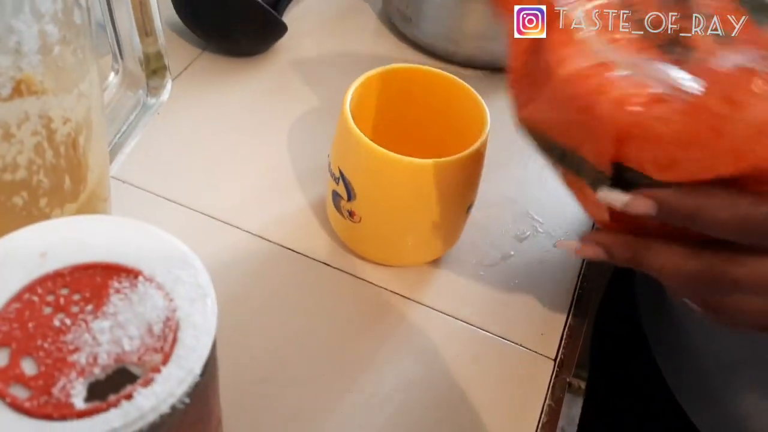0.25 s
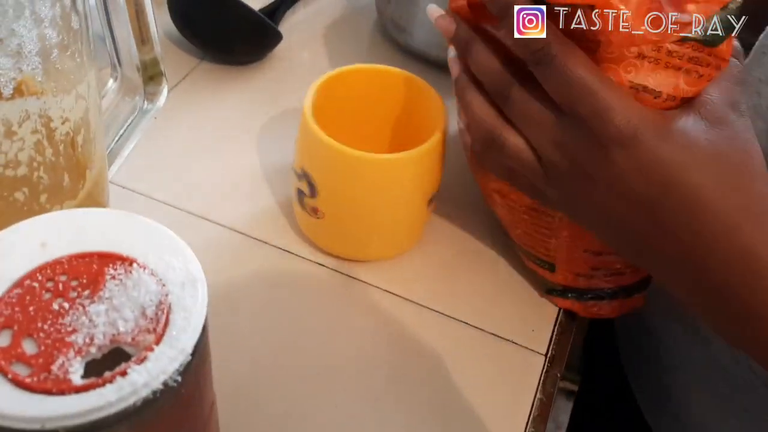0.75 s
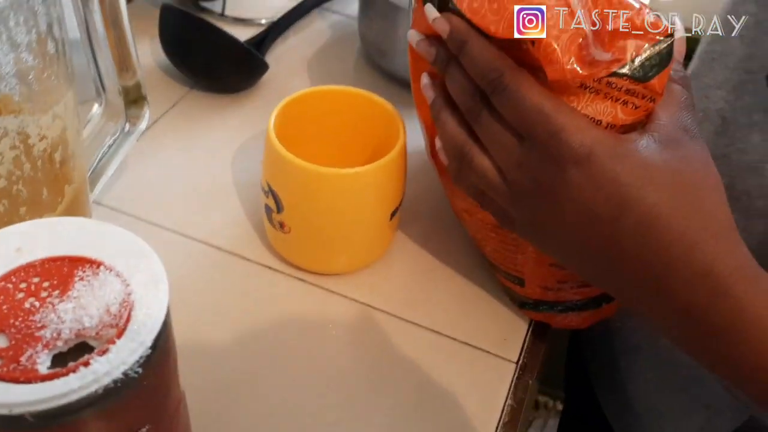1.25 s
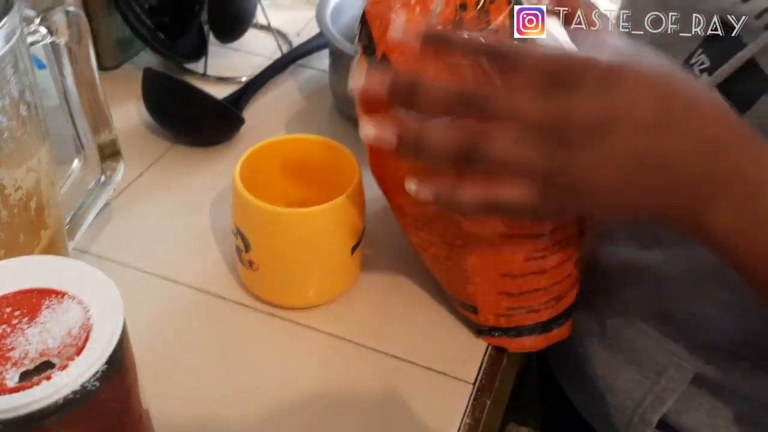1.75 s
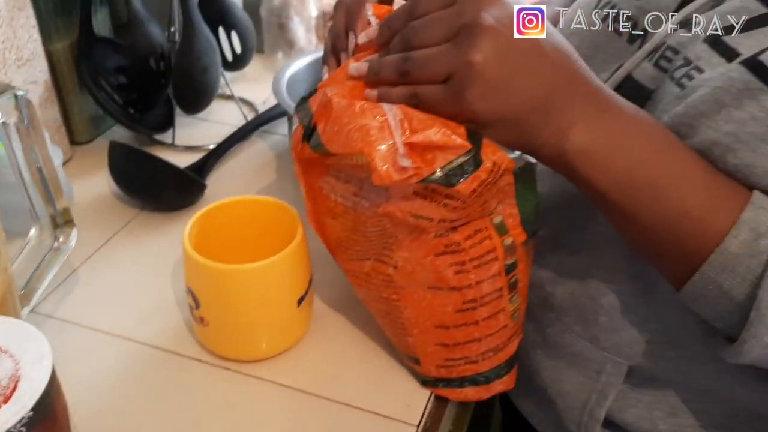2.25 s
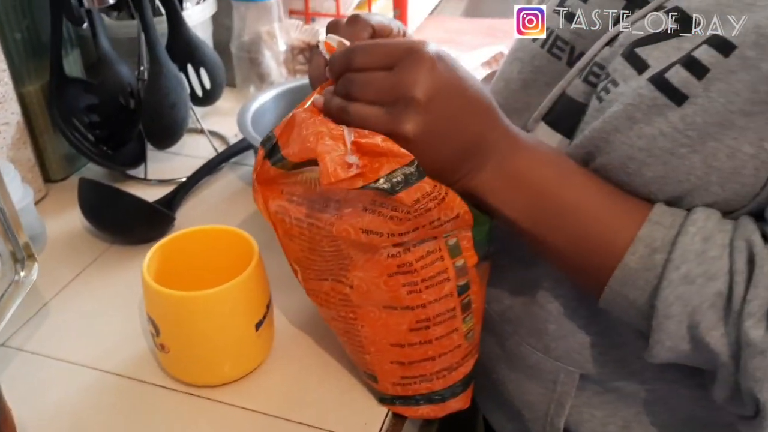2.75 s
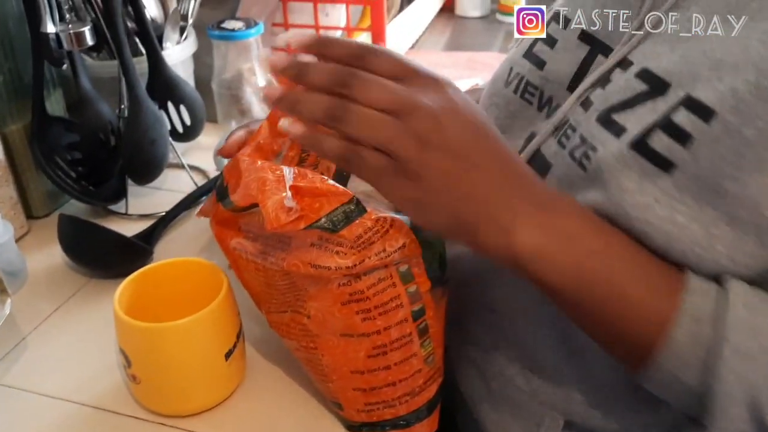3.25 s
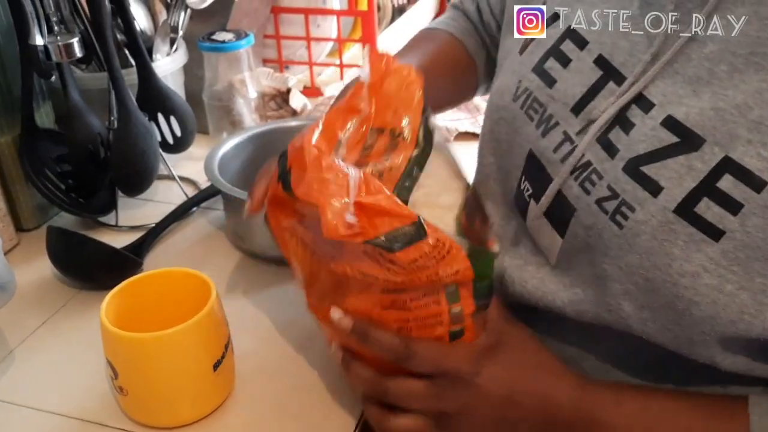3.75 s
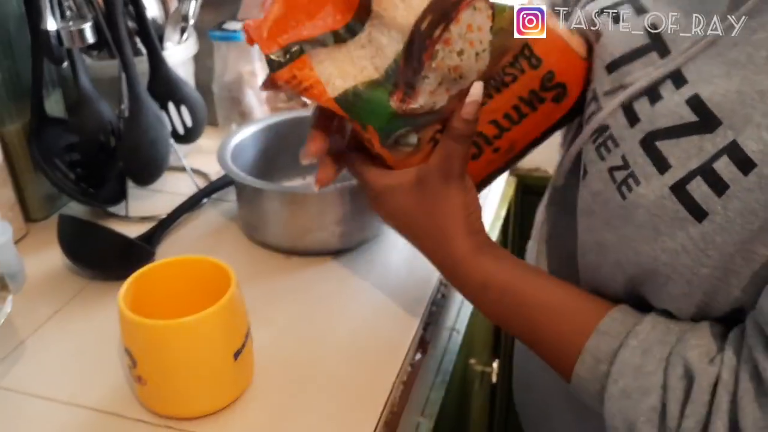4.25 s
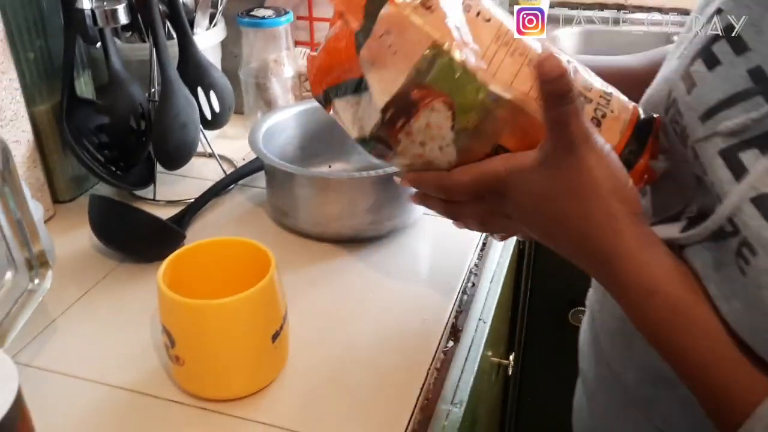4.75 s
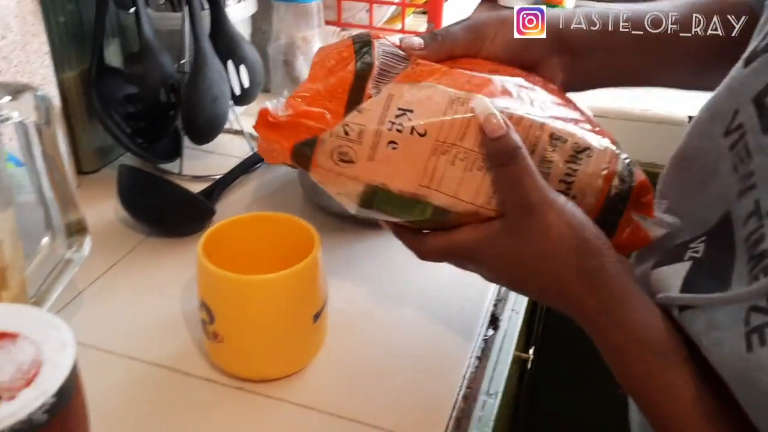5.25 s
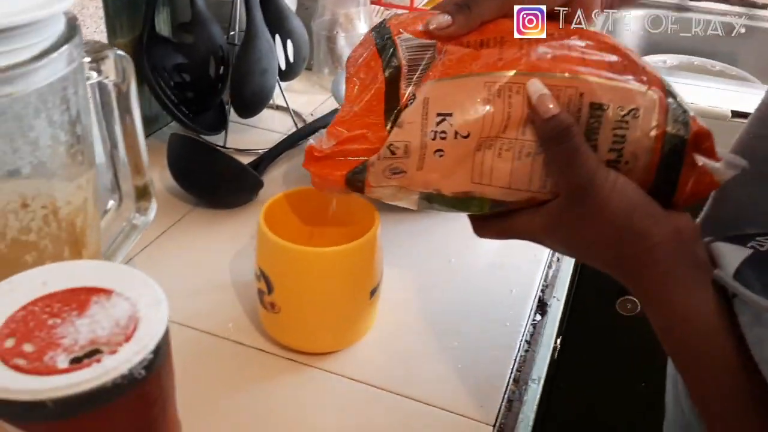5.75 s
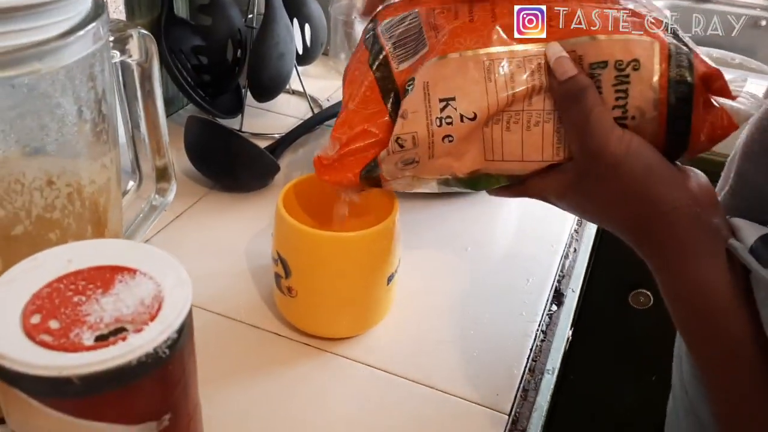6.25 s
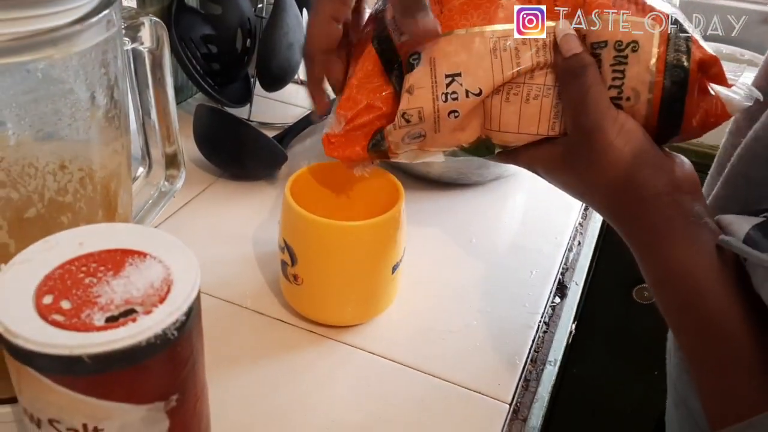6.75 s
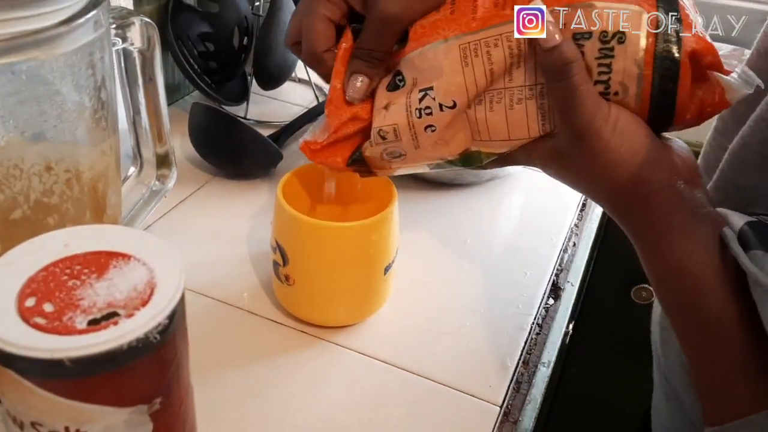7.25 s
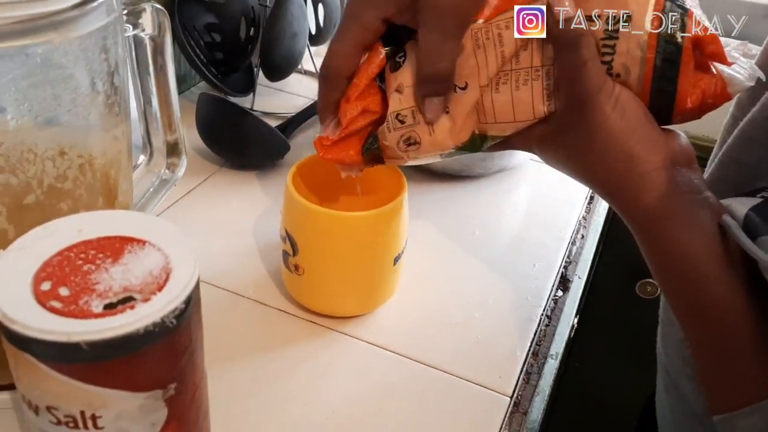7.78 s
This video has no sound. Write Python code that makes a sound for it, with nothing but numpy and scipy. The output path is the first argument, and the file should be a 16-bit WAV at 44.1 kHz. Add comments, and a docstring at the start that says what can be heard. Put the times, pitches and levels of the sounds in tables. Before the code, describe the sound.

A stiff plastic packet crinkles and snaps as rice shifts inside, then a thin stream of grains patters into a plastic cup.

```python
"""A plastic packet of dry rice is set down on a kitchen counter: its stiff film snaps and the rice lands
with a soft thud. At 0.74 s it drags, sticking and slipping in one short judder. As it is opened and
lifted, creases crinkle, taut patches pop, and rice slides and slumps inside. From 5.6 s a thin stream of
grains patters into a plastic cup while the packet crackles on. All along, two close microphones also
hear the small room's echo and low rumble."""
import sys
import numpy as np
from scipy import signal
from scipy.fft import rfft, irfft, next_fast_len
from scipy.io import wavfile
from scipy.ndimage import uniform_filter1d

SR = 44100
rng = np.random.default_rng(int(sys.argv[2]) if len(sys.argv) > 2 else 0)


def inscribe(sig):
    """Save sig as 16-bit PCM at rate SR to the path in sys.argv[1].

    A 1-D sig is mono; a 2-D sig holds one channel per row.
    Samples are clipped to [-1, 1] before scaling.
    """
    pcm = np.round(np.clip(np.atleast_2d(sig).T, -1, 1) * 32767)
    wavfile.write(sys.argv[1], SR, pcm.astype(np.int16))


N = 353682
TIME = np.arange(N) / SR
FREQS = np.fft.rfftfreq(4096, 1 / SR)  # the frequencies at which filters are drawn, in Hz


# Creases flipping; a broad fold has more bass: t/s, energy/dB, bass over treble/dB, length/s
CREASE_SNAPS = [(.0254, -0.5, 16, 0.0017), (.0798, -3, 6, 0.0091), (.099, 1, 2, 0.0019),
                (.1726, 4, -5.5, 0.0027), (.2696, 8, 9, 0.0021), (.321, 4, -33, 0.00038),
                (.6364, -3.5, 6, 0.00089), (.6843, 6.5, -9, .0042), (.8837, 2, 14.5, 0.0044),
                (1.0905, -11, 10, 0.0021), (1.1163, -7, 5, 0.0032), (1.1775, -7, 10, 0.0082),
                (1.1906, -3.5, -11, .0015), (1.2032, -6.5, 28, 0.0031), (1.2384, 5, 6, 0.0089),
                (1.2887, -3, 4.5, 0.0099), (1.5099, -0.5, -7, 0.0029), (1.5476, -8, 14, 0.00049),
                (1.552, 0.5, 4, 0.0017), (1.6337, -3.5, 19, 0.015), (1.6735, 1, 15.5, 0.0025),
                (1.7979, -3.5, 2, 0.003), (1.8872, 0, -2, 0.003), (1.9562, 3.5, -14, 0.0053),
                (1.993, 0.5, -8, 0.0023), (2.1509, -9.5, -4, .003), (2.247, -5.5, 10.5, 0.005),
                (2.4484, -5.5, 13, 0.0059), (2.4866, -2, 14, .0037), (2.5846, -1, 36, 0.0049),
                (2.607, 2, -4, 0.0015), (2.7469, -10, 8, 0.0092), (2.8408, -11.5, 6, .002),
                (3.0188, -7.5, 16, 0.01), (3.175, -9.5, -5, 0.02), (3.2311, -6, 16, 0.0026),
                (3.4395, -8.5, 1, 0.0033), (3.5884, -12.5, 21, 0.0018), (3.688, -3, 17, 0.0089),
                (3.7149, -1.5, 8, 0.0069), (3.7383, 2, -23, 0.0015), (4.0206, -3.5, 8, 0.0026),
                (4.3516, -9, 14, 0.0037), (4.4583, 0.5, 4, 0.0065), (4.632, -5.5, 6, 0.002),
                (4.6902, 3.5, 2.5, 0.011), (4.7366, -5.5, -18, 0.0052), (4.7867, -5.5, 34, .004),
                (4.9828, 0.5, -6, 0.0022), (4.9957, -12, 5, .006), (5.2429, 0.5, 1, 0.0039),
                (5.314, -8.5, 14, .0023), (5.6963, -1.5, 15, 0.0061), (5.713, -2, 0, 0.0027),
                (5.7503, -3, 13, 0.021), (5.791, 1, 2, 0.0051), (6.1768, -5.5, 12, 0.01),
                (6.2384, -6, 10, 0.011), (6.2748, -0.5, 7, 0.0043), (6.3008, 3.5, -8, .0025),
                (6.3666, 1, 1.5, 0.0023), (6.606, -16.5, -28, 0.0046), (6.8452, -0.5, 3.5, 0.0022),
                (6.8909, -4, 2, 0.0029), (6.9952, 0, 15, 0.008), (7.0467, -2.5, 9, 0.0036),
                (7.0941, 4.5, -4, 0.0016), (7.1069, 4.5, -3, 0.0016), (7.2476, -5, 15, 0.0044),
                (7.4356, -0.5, 7, 0.0035), (7.452, -0.5, 8, 0.0045), (7.5578, 1, 10.5, 0.0076),
                (7.7822, -2, 1, 0.0037), (7.8103, 1, -16, 0.0062), (7.8544, -4, -4, 0.00058),
                (7.8588, 5, 8, 0.0012), (7.925, 0.5, 13, .0018), (7.9433, 3, -10, 0.001),
                (7.9462, 8.5, 8.5, 0.0022)]
# How strong the snaps' highest treble is as time passes: t/s, level/dB
SNAP_TREBLE = [(0.0, -12), (1.2, -9), (1.55, -6), (3.1, -12.5), (3.73, -7.5), (4.1, -5), (4.5, -2.5),
               (6.3, -10.5), (7.1, -5), (7.95, -4)]

def crease_snaps(moving_db, crack=1.2, ripple_db=2.5):
    """A crease flips with a sharp crack or a brief shiver, and the sound scatters off the counter."""
    out, t = np.zeros((2, N)), np.arange(len(FREQS)) / SR
    scatter = amp(-23) * np.exp(-t / 0.01)
    small_snaps = [(s, db + 25 + 7 * size, 18 * breadth, 0.0031)
                   for s, db, size, breadth in random_moments(moving_db, count=45)]
    for s, db, bass_db, length in list(CREASE_SNAPS) + small_snaps:
        shiver = unit_rms((1 - np.exp(-8 * t / length)) * np.exp(-t / length) + scatter)
        burst = shiver * rng.standard_normal((2, len(t))) / np.sqrt(len(t))
        burst[[0, 1], [4, 8]] += crack * np.exp(-length / 0.0024)  # reaches the nearer, left side first
        burst = stereo_spread(burst)
        power = (abs(rfft(burst, 2 * len(t) - 2)) ** 2).mean(0)
        raw_tone = np.sqrt(uniform_filter1d(power, size=200))  # divided out below to even the burst
        mid_db = 1 + 0.69 * bass_db  # a broad fold is also stronger near 2 kHz
        top_db = np.interp(s, *np.transpose(SNAP_TREBLE))
        film_tone = [(60, bass_db - 7), (200, bass_db - 9), (450, bass_db), (1200, mid_db),
                     (2500, mid_db), (4200, 0), (6800, 0.021), (9500, top_db), (15000, top_db)]
        # every crease has peaks of its own
        ripple = np.c_[np.geomspace(600, 15000, 14), ripple_db * rng.standard_normal(14)]
        burst = filtered(burst, amp(over_freq(film_tone) + over_freq(ripple)) / raw_tone)
        add(out, s, amp(db) * unit_rms(burst) / np.sqrt(len(t)))
    return out


# Taut patches of film popping through: t/s, level/dB, f/Hz
FILM_POPS = [(1.117, -25, 2000), (1.696, -26, 1390), (1.9, -25, 6100), (1.957, -17, 2540),
             (2.02, -21, 1160), (2.283, -24.5, 1900), (2.748, -23.5, 2730), (2.932, -24, 425),
             (3.076, -24, 2760), (3.233, -30, 780), (3.324, -28, 740), (3.364, -20, 1230),
             (4.574, -20, 715), (4.787, -24, 604), (4.837, -19, 600), (5.076, -25, 616), (5.201, -25, 328),
             (5.713, -22.5, 2020), (6.277, -36, 1700), (6.42, -18.5, 686), (6.871, -22.5, 680),
             (6.958, -22.5, 590), (7.248, -23, 990), (7.782, -14.5, 1680)]

def film_pops(moving_db, rattle_depth=0.64, low_hz=500, high_hz=2800):
    """A patch pops and rings at one pitch with a slight rattle; extra ones pop at random times."""
    out, t = np.zeros((2, N)), np.arange(SR // 20) / SR
    extra_pops = [(s, db + 6 + 8 * size, low_hz * (high_hz / low_hz) ** pitch)
                  for s, db, size, pitch in random_moments(moving_db, count=28)]
    for s, db, hz in list(FILM_POPS) + extra_pops:
        decay_s = 0.0024 * (1000 / hz) ** 0.21  # higher pops die sooner
        rattle = unit_rms(uniform_filter1d(rng.standard_normal((2, len(t))), size=20, axis=1))
        add(out, s, amp(db) * ping(hz, decay_s, t) * (1 + rattle_depth * rattle))
    return out


# A hand moves the packet and the rice shifts: t/s, length/s, level/dB, weight/dB, brightness/dB
RICE_SHIFTS = [(0.067, 0.13, -38, -13.5, 2), (0.272, 0.11, -27.5, -6.5, -1),
               (0.347, .11, -28.5, -16.5, 1.5), (.47, 0.28, -37, -18, -4), (0.687, 0.07, -32, -0.5, -2),
               (0.796, 0.088, -41, 4, -0.5), (1.064, 0.083, -41, -3, -5.5),
               (1.192, 0.081, -36.5, 0.5, -2.5), (1.538, 0.036, -43.5, 5, -16),
               (1.668, 0.031, -36, 2, -6.5), (1.718, .12, -44, -7, -3.5), (1.995, 0.16, -40, -1, -1.5),
               (2.24, 0.027, -36, 0, -3.5), (2.392, 0.12, -44.5, 2, -1.5), (2.483, 0.17, -36, -3, -7),
               (2.66, 0.12, -43.5, 7.5, -0.5), (2.844, 0.044, -42.5, -3, -8.5),
               (2.914, 0.083, -42, 0, -5.5), (3.004, 0.072, -37, -2, -0.5),
               (3.165, 0.088, -39.5, 1.5, -7.5), (3.304, 0.061, -49.5, 6, -11),
               (3.563, 0.2, -44.5, -2.5, -3.5), (3.707, 0.05, -34.5, -4, -0.5),
               (3.793, 0.18, -39.5, -4, -2.5), (4.048, 0.13, -37, -13.5, -6.5),
               (4.362, 0.26, -39.5, -1, -4.5), (4.443, 0.079, -32, -3.5, -3.5),
               (4.574, .17, -36, -1.5, 1.5), (4.761, 0.06, -38.5, 0.5, -1), (4.976, 0.12, -38, -4.5, -4),
               (5.12, 0.13, -34, -11, -3.5), (5.55, 0.21, -46, -3, -3), (5.732, 0.13, -36.5, 2, -1.5),
               (5.88, 0.078, -39.5, -7, -3), (6.002, 0.043, -45.5, 2, -3), (6.132, 0.18, -38, -2.5, -7),
               (6.266, 0.2, -33.5, -3, 0), (6.47, 0.051, -38.5, 0.5, -1.5), (6.833, 0.12, -37.5, -4, -6.5),
               (6.975, .12, -39.5, 0, 3.5), (7.224, 0.11, -42.5, -1.5, -2), (7.424, 0.13, -37, 0.5, -4.5),
               (7.815, 0.037, -37, -8, -5), (7.939, .08, -34.5, -3.5, -4)]
# The faint rustle between shifts, greater while the packet is in the air: t/s, level/dB
FAINT_RUSTLE = [(0.0, -45), (.6, -42), (1.0, -55), (2.35, -57), (3.5, -49), (4.3, -47), (4.9, -45.5),
                (5.4, -49.5), (6.1, -52), (6.65, -59.5), (7.7, -49)]

def rice_movement(rise_s=0.01, sag_db_per_s=8, settle_db_per_s=199):
    """Rice starts quickly, slows a little, then settles. Gives its level, weight and brightness in dB."""
    total, weight, bright = amp(over_time(FAINT_RUSTLE)) ** 2, np.zeros(N), np.zeros(N)
    for start, length, db, weight_db, bright_db in RICE_SHIFTS:
        span = slice(round(start * SR), round(start * SR) + SR)
        t = TIME[span] - TIME[span][0]
        fading_db = db - sag_db_per_s * t - settle_db_per_s * np.maximum(t - length, 0)
        power = (np.minimum(t / rise_s, 1) * amp(fading_db)) ** 2
        total[span] += power
        weight[span] += power * weight_db
        bright[span] += power * bright_db
    return 10 * np.log10(total), weight / total, bright / total


# The hollow notes at which the packet rings: f/Hz, width/Hz, level/dB
PACKET_NOTES = [(168.4, 21.4, -5), (252, 39, -7), (322, 24.5, 3), (381, 16, -2), (510, 39, -9.5),
                (537, 52, -20.5)]
# The low, middle and high parts of the sound of sliding rice: f/Hz, level/dB
BODY_TONE = [(60, -23), (200, -6), (320, -0.5), (600, -0.5), (850, -3.5), (1300, -37.5), (3000, -73)]
RUSTLE_TONE = [(300, -31.5), (700, -14), (1050, 3.5), (1500, 3.5), (2400, 6), (3300, -11), (5000, -25.5),
               (10000, -35.5)]
FIZZ_TONE = [(1500, -37), (2800, -1.5), (4000, -0.5), (6500, 0), (8000, -5), (9800, -10), (12500, -8),
             (16000, -21)]

def sliding_rice(moving_db, weight_db, bright_db, rush_db=-28):
    """Grains scrape the film: a dull body from the mass of rice, a rustle and a fizz."""
    creases = amp(-5) * crinkle()
    ticks = unit_rms(grain_hits(per_s=700, size_db=3.5, length_s=0.0052, wash=1) + creases)
    tick_share = 1 / (1 + amp(moving_db - rush_db) ** 2)  # in a heavy rush, ticks merge into hiss
    hiss = rng.standard_normal((2, N))
    scrape = stereo_spread(np.sqrt(tick_share) * ticks + np.sqrt(1 - tick_share) * hiss)
    body = unit_rms(filtered(scrape, amp(over_freq(BODY_TONE)) * (0.21 + ringing(PACKET_NOTES))))
    rustle = unit_rms(filtered(scrape, amp(over_freq(RUSTLE_TONE))))
    fizz = unit_rms(filtered(scrape, amp(over_freq(FIZZ_TONE))))
    loudness = amp(moving_db + 1.5 * tick_share * wander(span_s=0.022))
    return loudness * (amp(weight_db - 2.3) * body + amp(-3) * rustle + amp(bright_db - 1.5) * fizz)


def crinkle(low_hz=550, high_hz=4500, size_db=3.7, decay_cycles=2.2, count=11000):
    """Countless small creases tick at random, each with its own pitch, size and place."""
    when, size, side, pitch = rng.random((count, 4)).T[:, :, None]
    t = np.arange(SR // 150) / SR
    hz = low_hz * (high_hz / low_hz) ** pitch
    ticks = np.sin(2 * np.pi * hz * t) * np.exp(-t * hz / decay_cycles) * (1 - t / t[-1])
    ticks *= hz * amp(size_db * np.minimum(-np.log(size), 4))
    samples = ((when * N).astype(int) + np.arange(len(t))).ravel()
    facing = np.cos(2 * np.pi * side), np.sin(2 * np.pi * side)  # how it faces each microphone
    return unit_rms(np.array([np.bincount(samples, (ticks * gain).ravel(), N)[:N] for gain in facing]))


# How strongly the rice flows into the cup: t/s, level/dB
POUR_FLOW = [(5.6, -56), (5.79, -46), (6.1, -46.5), (6.42, -45), (6.6, -56.5), (6.96, -52), (7.12, -46),
             (7.24, -44), (7.33, -53), (7.56, -44), (7.7, -59), (7.83, -49), (8.02, -54)]
# The high, short notes of the cup: f/Hz, width/Hz, level/dB
CUP_NOTES = [(4720, 390, 0), (5630, 350, -0.5), (6800, 200, 1), (8000, 460, 4), (9200, 400, -4),
             (10860, 350, -0.5), (12000, 700, -2.5), (13800, 500, -1), (15400, 500, -7)]

def pouring_rice(full_per_s=1600, full_db=-43, clump_db=2.8):
    """Grains fall in clumps onto the heap and the ringing cup. A thin flow parts into single ticks."""
    flow_db = over_time(POUR_FLOW)
    per_s = full_per_s * np.clip(amp(flow_db - full_db), 0.12, 2)
    density = per_s / per_s.mean()
    ticks = grain_hits(per_s, size_db=3.6, length_s=0.0012, wash=0.1 * density) / np.sqrt(density)
    cup = ringing(CUP_NOTES) / np.sqrt(1 + (3800 / (FREQS + 1)) ** 6)
    loudness = amp(flow_db + clump_db * wander(span_s=0.014) + 4) * (TIME > POUR_FLOW[0][0])
    return loudness * unit_rms(filtered(ticks, cup))


# The rice slumps and the packet bumps: t/s, ring level/dB, push level/dB
RICE_THUDS = [(.292, -32, -39), (.886, -41.5, -53), (1.241, -31, -33), (1.275, -33.5, -41),
              (1.299, -31.5, -38), (1.55, -39.5, -62), (2.606, -30.5, -39), (2.756, -32.5, -41),
              (3.019, -36.5, -61), (4.468, -35.5, -48), (4.685, -37, -44), (5.195, -38, -39),
              (5.839, -38.5, -35), (5.98, -39.5, -40), (6.006, -40.5, -40), (6.847, -39.5, -46),
              (7.096, -45, -45), (7.543, -33, -38), (7.944, -36, -34)]
# The deep sound of weight pushing on the counter: f/Hz, level/dB
PUSH_TONE = [(25, -12), (60, -7.5), (100, 2), (150, -10.5), (220, -8.5), (500, -41)]

def rice_thuds(rise_s=0.00062, fall_s=0.022, push_hz=128):
    """A soft, heavy blow: settling rice rings the packet while its weight pushes on the counter."""
    out, t = np.zeros((2, N)), np.arange(SR // 5) / SR
    for s, ring_db, push_db in RICE_THUDS:
        swell = (1 - np.exp(-t / rise_s)) * np.exp(-t / fall_s)
        blow = stereo_spread(swell * rng.standard_normal((2, len(t))))
        ring = filtered(blow, ringing(PACKET_NOTES) / (1 + (FREQS / 900) ** 2))
        low_note = ping(push_hz * rng.uniform(0.753, 1.214), decay_s=0.025, t=t)
        push = unit_rms(low_note) + 0.89 * unit_rms(filtered(blow, amp(over_freq(PUSH_TONE))))
        add(out, s, amp(ring_db - 7) * unit_rms(ring) + amp(push_db - 8) * unit_rms(push))
    return out


# The notes that ring as the packet drags: f/Hz, width/Hz, level/dB
DRAG_NOTES = [(249, 23, -8.5), (355, 18, -30), (482, 22, -5.5), (850, 40, 4.5), (1227, 22, -3)]

def packet_drag(start_s=0.74, length_s=0.093, rise_s=0.002, fall_s=0.008, slips_per_s=121):
    """The packet sticks and slips unevenly on the counter, making a short rubbery groan."""
    t = TIME - start_s
    stroke = np.clip(t / rise_s, 0, 1) * np.exp(-np.maximum(t - length_s, 0) / fall_s)
    jitter = 0.14 * unit_rms(uniform_filter1d(rng.standard_normal(N), size=200))
    slips_so_far = np.floor(np.cumsum(slips_per_s * (1 + jitter)) / SR)
    slips = np.diff(slips_so_far, prepend=0)
    grit = 0.045 * rng.standard_normal((2, N))
    groan = filtered(slips + grit, ringing(DRAG_NOTES) / (1 + (FREQS / 1500) ** 4))
    power = abs(uniform_filter1d((groan ** 2).mean(0), size=400))
    groan = groan / np.sqrt(power + 1e-12)  # friction holds the swing steady
    return amp(-25 + 2 * wander(span_s=0.012)) * stroke * groan


# How long the room's echo takes to fade by 60 dB: f/Hz, length/s
ECHO_FADE = [(100, 0.17), (400, 0.37), (2000, 0.23), (6000, 0.27), (16000, 0.22)]

def kitchen_echo(sound, build_s=0.00056, patterns=3):
    """Sound bounces off tiles and cupboards; echo patterns keep blending, so no fixed pitch rings out."""
    out = np.zeros((2, N))
    for k in range(patterns):
        hz, t, noise = signal.stft(rng.standard_normal((2, SR // 2)), SR, nperseg=256)
        fade = amp(-60 * t / over_freq(ECHO_FADE, hz)[:, None])
        tail = signal.istft(noise * fade, SR, nperseg=256)[1]
        onset = 1 - np.exp(-(np.arange(tail.shape[1]) / SR / build_s) ** 2)
        tail = stereo_spread(tail * onset)
        share = np.sqrt(2 / patterns) * np.cos(np.pi * (TIME + k / patterns) * (2 + k))
        out += signal.fftconvolve(sound * share, tail / np.linalg.norm(tail[0]), axes=1)[:, :N]
    return out


# The kitchen's low background noise: f/Hz, level/dB
RUMBLE_TONE = [(20, -1), (40, -29), (60, 1), (75, -5.5), (93, 3), (115, -7.5), (160, -5), (210, -28),
               (330, -8), (500, -16), (1200, -23), (4000, -73), (16000, -40)]

def room_rumble(steady_db=-47.5, bass_db=-50, swell_db=2):
    """A steady background noise, with a bass that swells and ebbs at random."""
    tone = amp(over_freq(RUMBLE_TONE))
    steady = unit_rms(filtered(stereo_spread(rng.standard_normal((2, N))), tone))
    bass = unit_rms(filtered(rng.standard_normal((1, N)), tone / (1 + (FREQS / 220) ** 4)))
    return amp(steady_db) * steady + amp(bass_db + swell_db * wander(span_s=0.15)) * bass


# How alike left and right sound: f/Hz, likeness (0 unrelated, 1 the same)
STEREO_LIKENESS = [(60, 0.93), (140, 0.97), (300, 0.97), (640, 0.63), (1400, 0.15), (3000, 0),
                   (16000, 0.077)]

def stereo_spread(x):
    """Two microphones share the bass but each hears its own treble."""
    size = next_fast_len(x.shape[1])
    left, other = rfft(x, size)
    same = np.clip(over_freq(STEREO_LIKENESS, np.fft.rfftfreq(size, 1 / SR)), -1, 1)
    right = same * left + np.sqrt(1 - same ** 2) * other
    return irfft([left, right], size)[:, :x.shape[1]]


def grain_hits(per_s, size_db, length_s, wash):
    """Random tiny hits, a few large, each a burst of noise, over a wash of countless smaller ones."""
    sizes = amp(size_db * np.minimum(rng.exponential(1, N), 4))
    hits = sizes * (rng.random(N) < per_s / SR)
    power = signal.lfilter([1], [1, -np.exp(-2 / (length_s * SR))], hits ** 2)
    return np.sqrt(power / power.mean() + wash) * rng.standard_normal((2, N))


def ping(hz, decay_s, t):
    """A struck surface swings up and rings down."""
    return np.sin(2 * np.pi * hz * t) * np.exp(-t / decay_s) * (1 - np.exp(-t * hz * 2))


def ringing(notes):
    """Filter gains with a peak at each note of a ringing object."""
    return np.sqrt(sum(amp(db) ** 2 / (1 + ((FREQS ** 2 - hz ** 2) / (width * (FREQS + 1))) ** 2)
                       for hz, width, db in notes))


def filtered(x, gain):
    """Applies one gain per entry of FREQS, never ringing ahead of the sound (minimum phase)."""
    log_gain = np.log(np.maximum(np.r_[gain, gain[-2:0:-1]], 1e-5))
    taps = irfft(np.exp(np.conj(signal.hilbert(log_gain)))[:len(FREQS)])
    return signal.oaconvolve(x, taps[None], axes=1)[:, :x.shape[1]]


def random_moments(moving_db, count):
    """Rows of a random time, the movement's level then, and two random numbers from 0 to 1."""
    when, a, b = rng.random((count, 3)).T
    times = when * TIME[-1]
    return zip(times, np.interp(times, TIME, moving_db), a, b)


def wander(span_s):
    """A random curve that drifts to a new value every span_s."""
    return unit_rms(np.interp(TIME, span_s * np.arange(4000), rng.standard_normal(4000)))


def over_freq(table, hz=FREQS):
    """Joins a table's points along a logarithmic frequency axis."""
    f, value = np.transpose(table)
    return np.interp(np.log(hz + 1), np.log(f + 1), value)


def over_time(table):
    """Joins a table's points into one value per sample."""
    return np.interp(TIME, *np.transpose(table))


def add(mix, s, sound):
    """Mixes a stereo sound in at time s."""
    part = mix[:, max(round(s * SR), 0):][:, :sound.shape[1]]
    part += sound[:, :part.shape[1]]


def amp(db):
    """Turns decibels into a gain."""
    return 10 ** (np.asarray(db) / 20)


def unit_rms(x):
    """Scales a signal to an average power of 1."""
    return x / np.sqrt(np.mean(x ** 2) + 1e-20)


def scene():
    """Packet, rice and cup close by, with the room behind."""
    moving_db, weight_db, bright_db = rice_movement()
    film = crease_snaps(moving_db) + film_pops(moving_db)
    rice = sliding_rice(moving_db, weight_db, bright_db) + pouring_rice()
    bumps = rice_thuds() + packet_drag()
    echo = kitchen_echo(amp(-4.5) * film + amp(-9) * (rice + bumps))
    return film + rice + bumps + echo + room_rumble()


# How much louder the left microphone is than the right: f/Hz, level/dB
MIC_BALANCE = [(60, 1), (95, 0.5), (150, 4), (240, 1), (380, 0), (600, 4), (950, 3), (1500, 3.5),
               (2380, -0.5), (3770, 2), (5980, -4.5), (9470, 1), (15000, 1.5)]

def record(dry, lowest_hz=46, highest_hz=15900, ceiling=0.85):
    """Each microphone has its own tone; both drop the deepest bass and the highest treble."""
    lean_db = over_freq(MIC_BALANCE)
    heard = np.vstack([filtered(dry[:1], amp(lean_db / 2)), filtered(dry[1:], amp(-lean_db / 2))])
    heard = signal.sosfilt(signal.butter(3, lowest_hz, "high", fs=SR, output="sos"), heard)
    heard = heard / (1 + (heard / ceiling) ** 6) ** (1 / 6)  # rounds off the hardest cracks
    treble_cut = signal.firwin(511, highest_hz, window=("kaiser", 9), fs=SR)
    return signal.oaconvolve(heard, treble_cut[None], "same")


dry = scene()
out = record(dry)
inscribe(out)
```